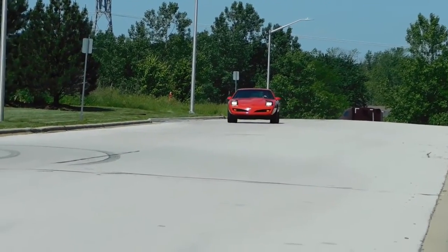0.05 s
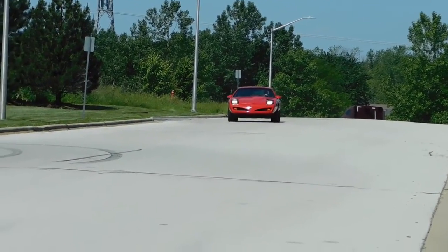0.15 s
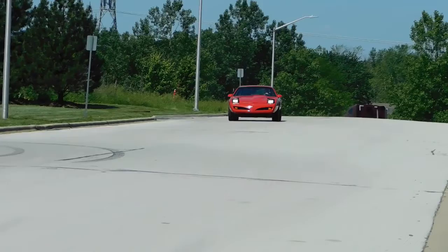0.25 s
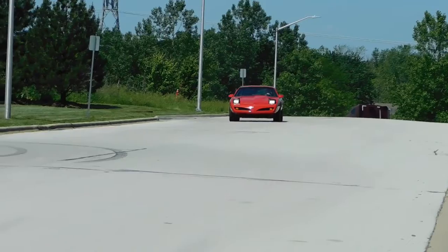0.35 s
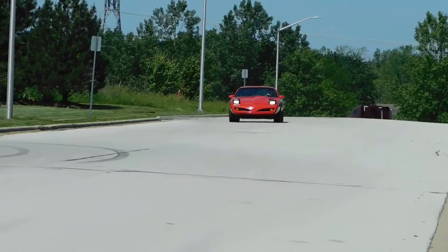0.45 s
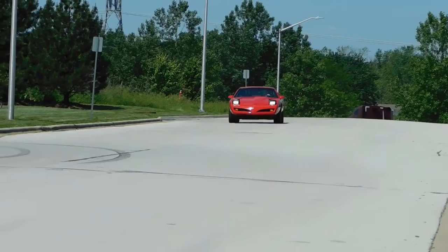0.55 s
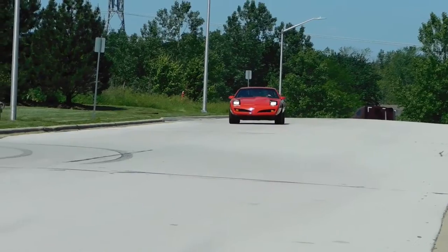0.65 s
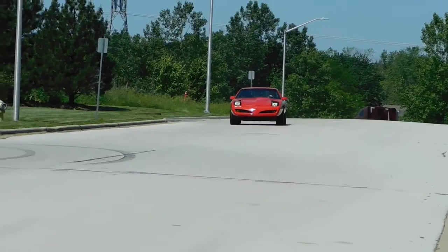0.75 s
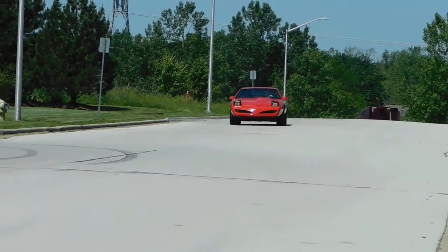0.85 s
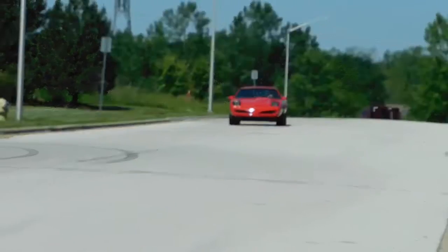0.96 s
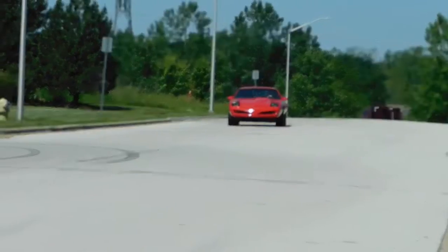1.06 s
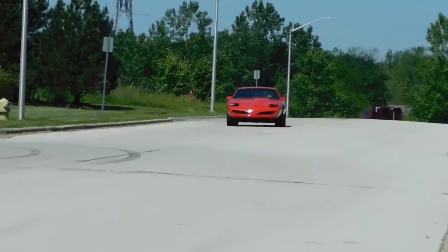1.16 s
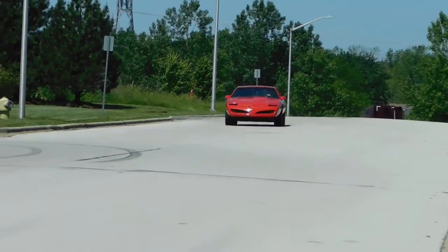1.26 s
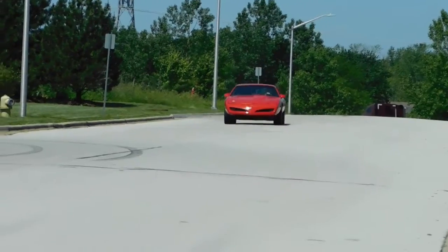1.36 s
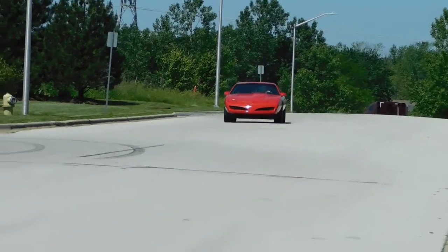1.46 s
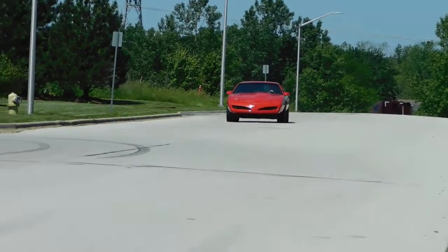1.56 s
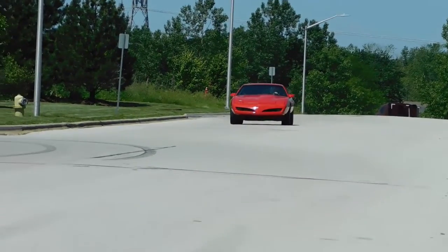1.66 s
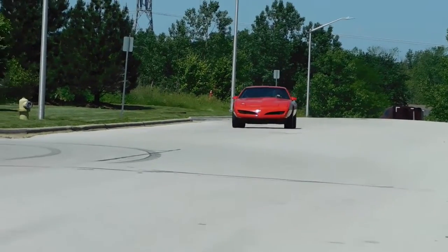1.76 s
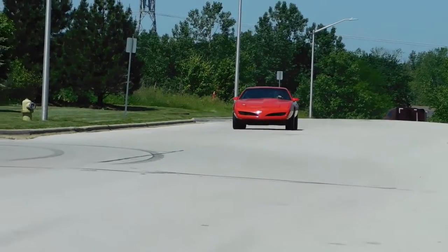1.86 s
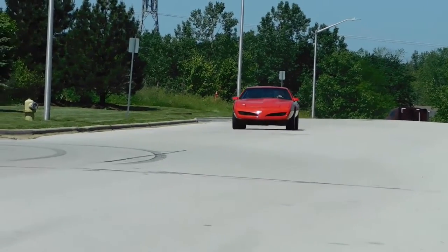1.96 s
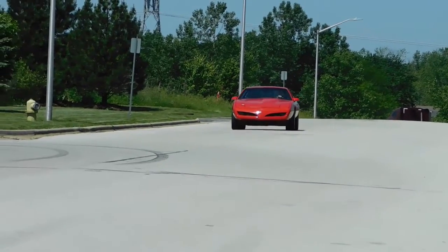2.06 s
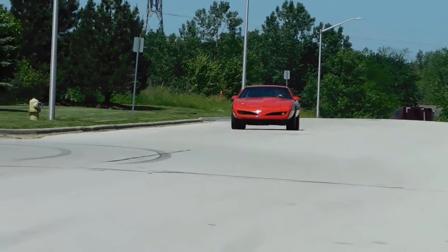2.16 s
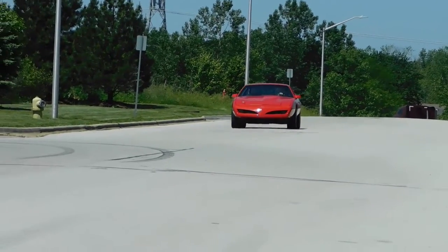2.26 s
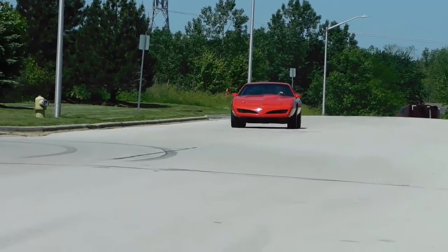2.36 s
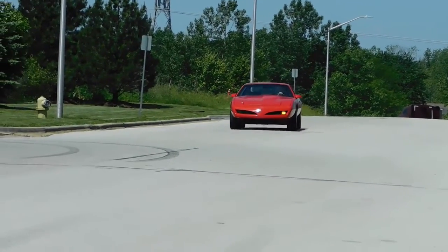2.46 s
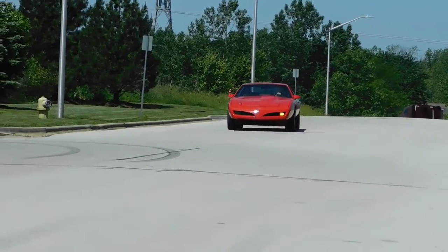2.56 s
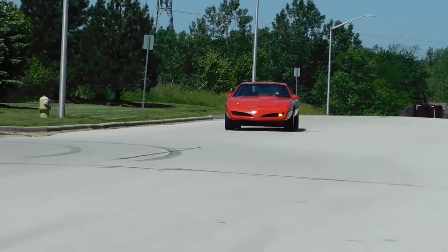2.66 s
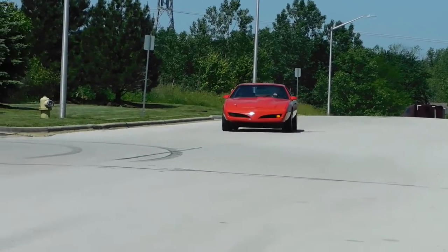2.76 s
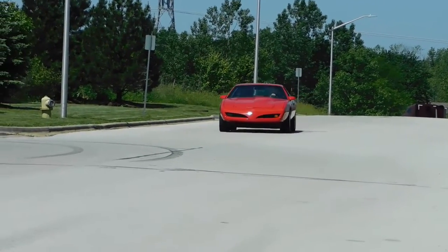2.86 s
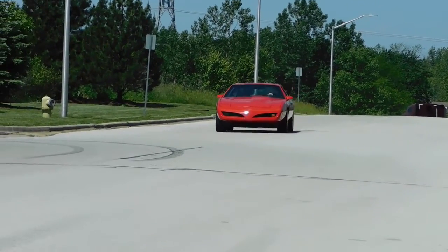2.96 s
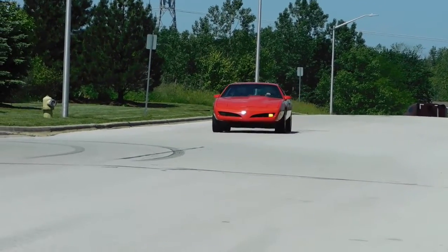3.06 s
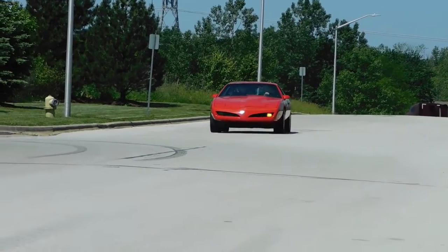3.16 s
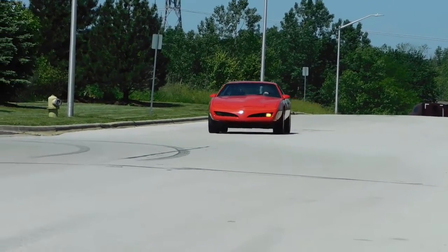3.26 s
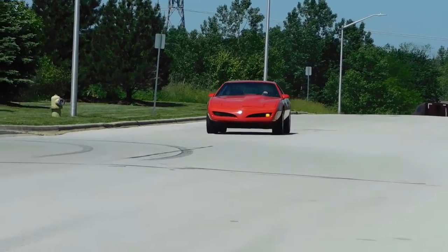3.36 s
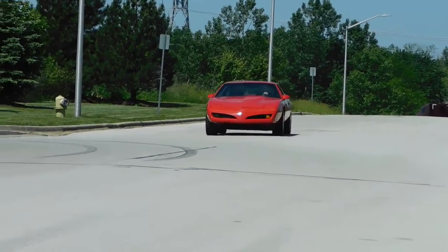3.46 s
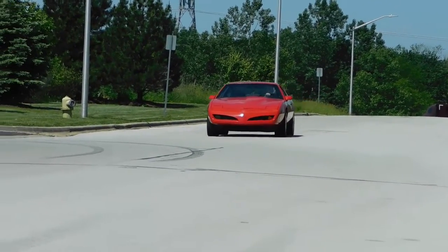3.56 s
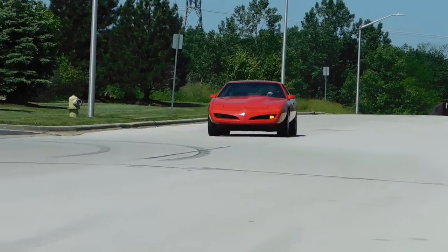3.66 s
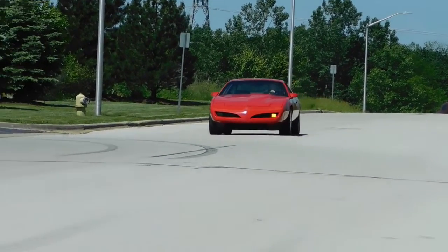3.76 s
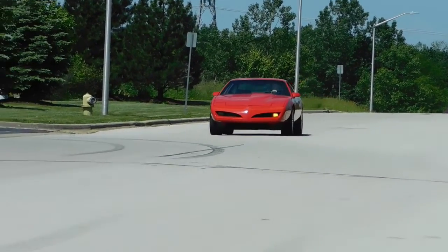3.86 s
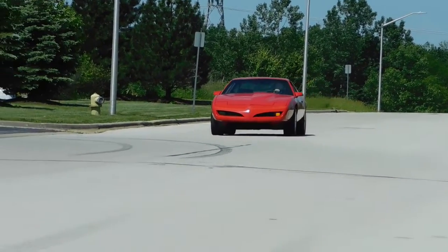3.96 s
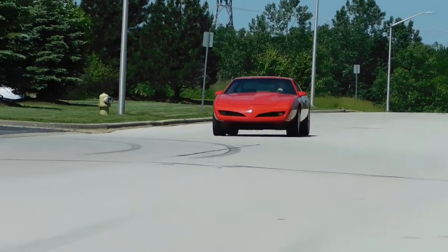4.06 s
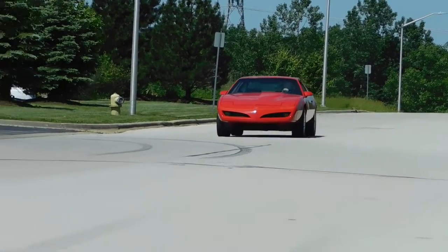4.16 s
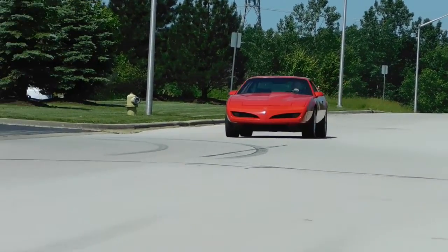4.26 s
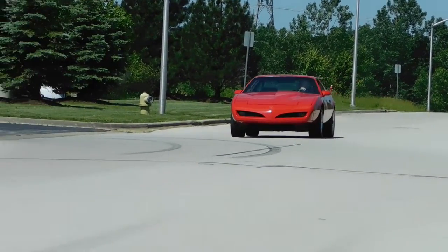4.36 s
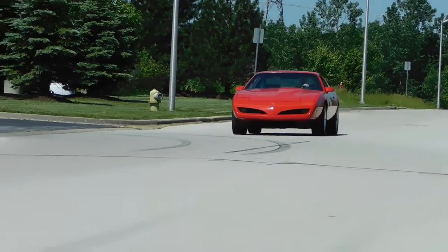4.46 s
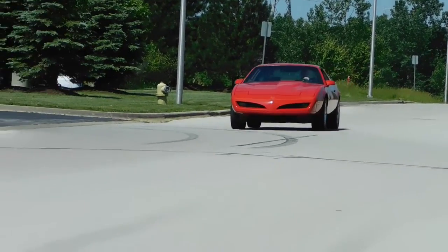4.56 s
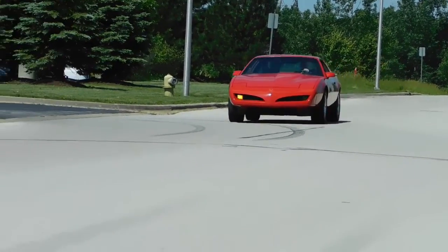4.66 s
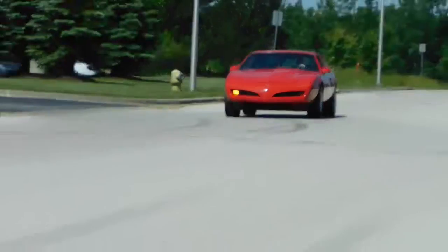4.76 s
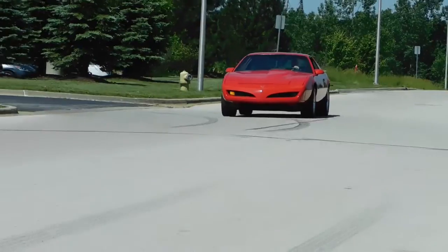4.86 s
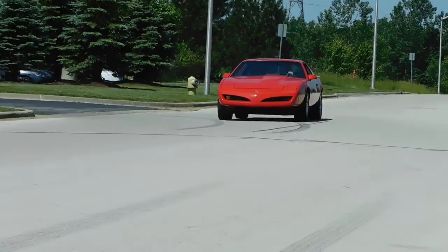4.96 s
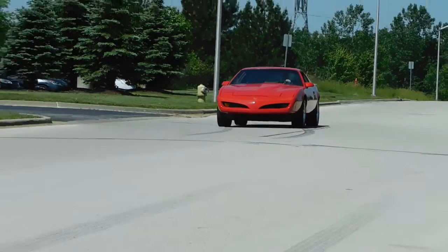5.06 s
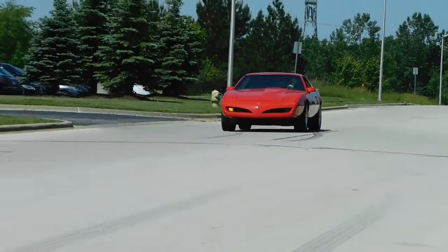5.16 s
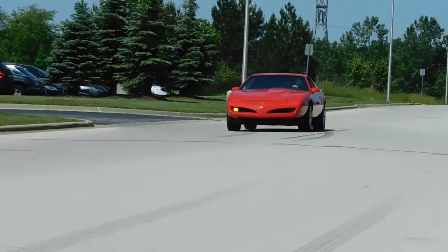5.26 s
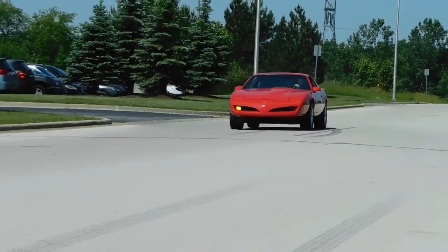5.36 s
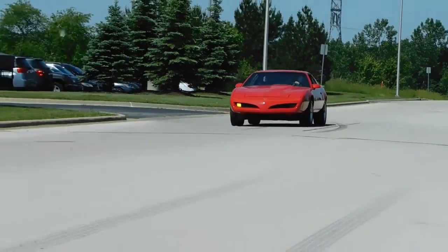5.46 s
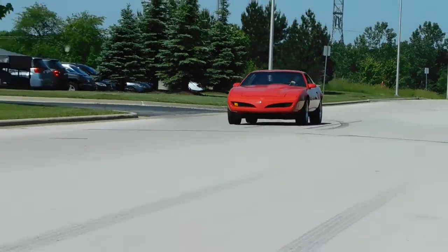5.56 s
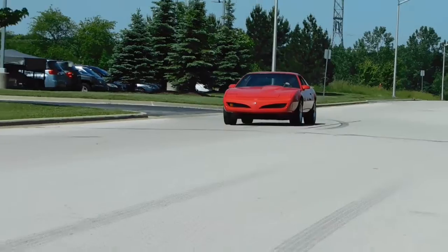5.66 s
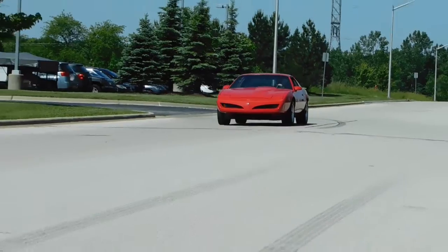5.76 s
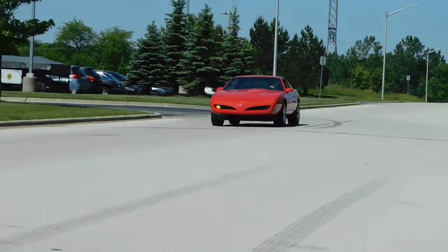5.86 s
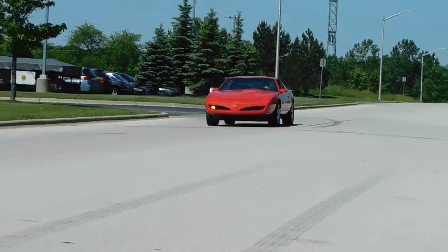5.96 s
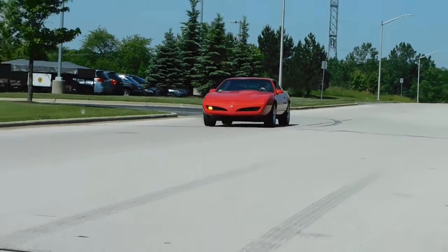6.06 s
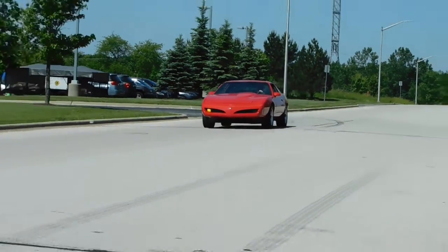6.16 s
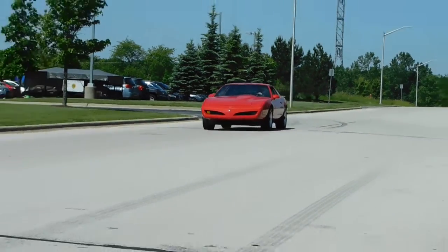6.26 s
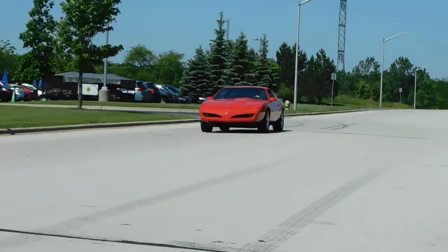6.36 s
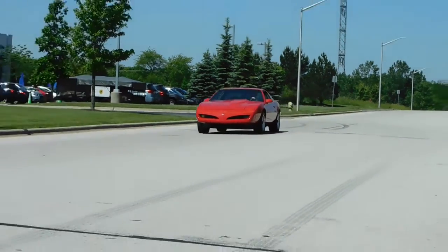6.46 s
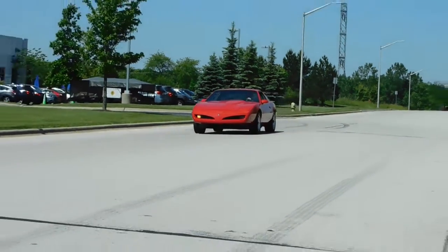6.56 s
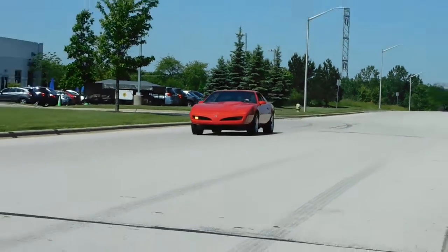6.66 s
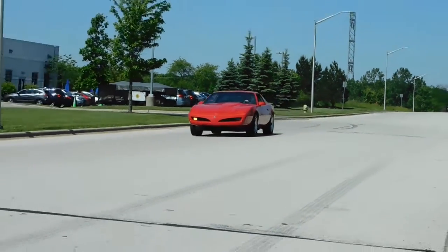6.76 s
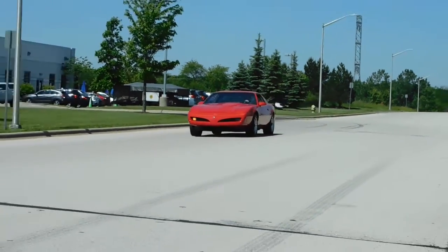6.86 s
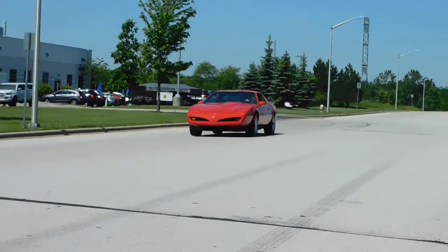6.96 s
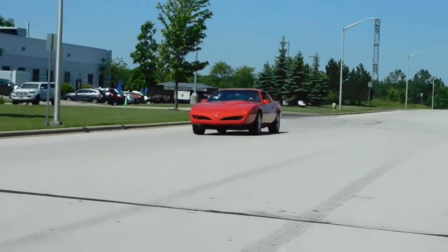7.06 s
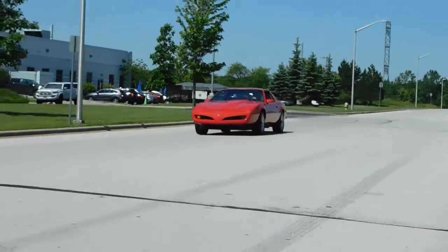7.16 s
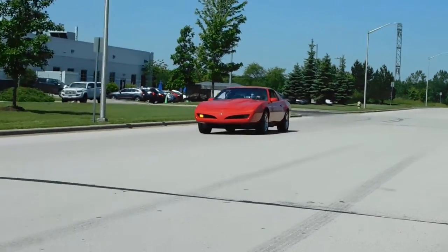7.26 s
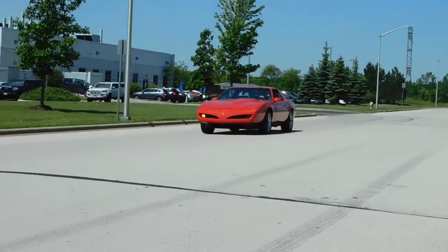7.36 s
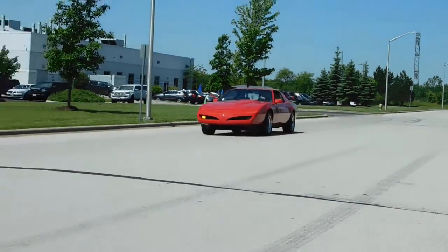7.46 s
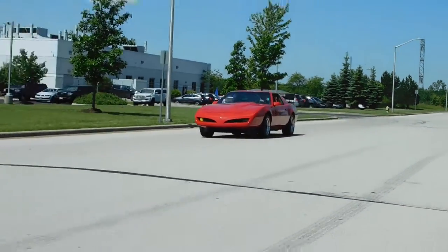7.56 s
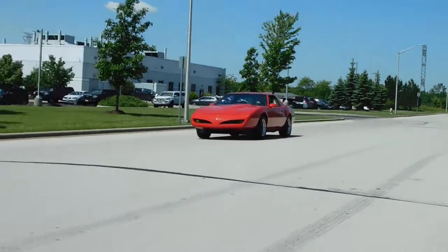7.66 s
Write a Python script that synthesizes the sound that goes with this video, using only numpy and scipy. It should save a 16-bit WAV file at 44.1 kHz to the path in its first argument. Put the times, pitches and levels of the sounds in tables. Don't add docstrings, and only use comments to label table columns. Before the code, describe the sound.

Outdoors beside a wide concrete road, a handheld stereo microphone picks up distant traffic hum and sparse bird chirps. A car approaches head on, its tyre roar steadily swelling. Small knocks and a faint lens motor whirr sit close by. Three short, buzzing two-tone horn toots ring out about half a second apart with brief echoes, then the engine surges upward as the clip ends.

```python
import sys
import numpy as np
from scipy import signal
from scipy.fft import rfft, irfft, next_fast_len
from scipy.io import wavfile
from scipy.ndimage import uniform_filter1d

SR = 44100
rng = np.random.default_rng(int(sys.argv[2]) if len(sys.argv) > 2 else 0)


def to_wav(sig):
    pcm = np.clip(np.atleast_2d(sig), -1, 1) * 32767
    pcm = np.round(pcm).astype(np.int16)
    wavfile.write(sys.argv[1], SR, pcm.T)


def field_ratio(decibels):
    return 10 ** (np.asarray(decibels, dtype=float) / 20)


N = 340438
T = np.arange(N) / SR
PADDED = 2 * next_fast_len(N // 2 + 2048)
HZ = np.maximum(np.fft.rfftfreq(PADDED, 1 / SR), 1)

# time_s, second_firing_order_hz, load_db
ENGINE = [(3.9, 160.8, -78), (4.28, 173, -58), (4.6, 176.4, -63.5), (4.94, 145.4, -62.5),
          (5.88, 152.3, -56.5), (6.54, 154.7, -55), (7.05, 162.5, -55), (7.31, 164, -53),
          (7.42, 207.6, -42), (7.5, 255.3, -40.5), (7.6, 288, -40.5), (7.72, 324.6, -47)]
# time_s, level_db
NEARNESS = [(0, -62), (1, -52.5), (2, -52), (3.1, -44.5), (3.6, -45), (4.1, -41.5), (5, -39), (6, -38),
            (6.5, -34.5), (7.2, -31.5), (7.5, -29), (7.72, -25.5)]
# pitch_hz, level_db (per Hz)
TYRE_ROAR = [(240, -37.5), (400, -15), (453, -7.5), (485, -11), (600, -16), (943, 0.5), (1060, -1),
             (1330, -0.5), (1560, -10.5), (1900, -10.5), (2080, -15.5), (2620, -18.5), (4000, -28.5),
             (5200, -48), (8800, -120)]
# pitch_hz, level_db (per Hz)
LOW_RUMBLE = [(24, -58), (40, -37), (70, -6), (193, -6.5), (242, -2.5), (307, -6.5), (457, -9), (600, -19),
              (780, -49), (1320, -120)]
# pitch_hz, level_db (per Hz)
BRIGHT_HISS = [(1180, -37), (2000, -6), (2520, -2.5), (3620, -8.5), (5150, -11), (7020, -8.5),
               (9090, -16.5), (10900, -30.5), (11500, -29.5), (13000, -21), (15000, -31.5), (15600, -38)]
CYLINDERS = [4, -9, 6, -13, -2.5, 6, -8, -8]
FIRING_ORDERS = [-3, -0.5, -9.5]
# start_s, length_s, start_hz, end_hz, level_db
DRONES = [
    (4.801, 1.32, 356, 363.5, -56.5),
    (5.4, .92, 250, 260, -59.5),
    (6.9, 0.664, 344, 365.3, -52),
    (6.9, .35, 447, 458, -53),
    (7.202, 0.38, 115, 121.6, -53.5),
    (7.348, .56, 89, 101.3, -48.5),
    (7.54, .13, 245, 268, -42.5),
]
# pitch_hz, level_db (per Hz)
FAR_TRAFFIC = [(15, -62), (25, -21), (66, -10.5), (169, -11), (204, -10), (332, -9), (423, -8.5),
               (725, -8.5), (975, -3.5), (1060, -4), (1380, -5.5), (1670, -8.5), (1860, -10.5),
               (2790, -17.5), (15600, -53)]
# pitch_hz, likeness (0 to 1)
FAR_ALIKE = [(300, 1), (700, 0.93), (1150, 0.99), (1800, .45), (2500, 1), (4000, 0.22), (9000, 0.055)]
# pitch_hz, likeness (0 to 1)
CAR_ALIKE = [(300, 0.98), (700, 0.83), (1250, 1), (2100, .8), (4000, 0.66), (9000, 0.36), (13000, 0.25)]
# start_s, length_s, start_hz, end_hz, level_db
CHIRPS = [(.175, .03, 4850, 4150, -67), (.345, .015, 4100, 4100, -66), (0.389, .025, 4350, 3450, -62.5),
          (1.36, .03, 4850, 4250, -68), (1.42, .02, 2900, 2800, -66), (1.53, .02, 4400, 4300, -70),
          (1.555, .04, 4450, 4250, -70), (1.725, .03, 4900, 4230, -74), (1.785, .043, 3770, 3420, -63),
          (2.43, .02, 4800, 4320, -69), (2.68, .02, 4170, 4200, -69), (3.795, .03, 4400, 4100, -67),
          (3.827, .033, 4100, 4500, -67), (4.771, .16, 3990, 3960, -60)]
# start_s, start_hz, first_level_db, second_level_db
CHIRP_PAIRS = [
    (3.597, 4650, -72, -67),
    (3.84, 4830, -64, -67),
    (4.012, 4700, -65, -64),
    (4.158, 4650, -65, -64),
    (4.317, 4600, -62, -68),
    (4.46, 4600, -60, -69),
]
# start_s, length_s, level_db
WHISTLES = [
    (3.35, .12, -86),
    (3.64, .07, -79),
    (3.895, .064, -76),
]
# start_hz, middle_hz, end_hz
WHISTLE_BEND = (7050, 7230, 7240)
# start_s, length_s, start_hz, middle_hz, end_hz, level_db
THROBBING_TONE = [
    (3.963, 0.62, 7480, 7510, 7250, -69.5),
]
# start_s, arch_top_hz, short_arch_top_hz, closing_start_s, level_db
HOARSE_CALLS = [
    (.733, 4370, 3060, .796, -52),
    (2.166, 5040, 3720, 2.237, -50.5),
]
# delay_s, length_s, start_hz, middle_hz, end_hz
CLOSING_FIGURE = [
    (0, .024, 2990, 3260, 4300),
    (0.027, .025, 3920, 3220, 3220),
]
# start_s, peak_db, ring_hz, crack_db, left_over_right_db
KNOCKS = [(2.806, -14.5, 1225, -60, 0), (2.883, -26, 1110, -60, 0), (4.672, -30, 3100, -60, -6),
          (4.722, -32, 3380, -44, 10), (4.758, -27.5, 637, -28, 4), (4.76, -29, 1700, -60, 4),
          (6.2855, -10.5, 1280, -14.5, -1.5), (6.2842, -12.5, 2030, -20.5, 0),
          (6.292, -15.5, 1100, -49, -5), (7.342, -18, 2220, -21.5, -1), (6.287, -23.5, 420, -60, -1)]
# start_s, peak_db, ring_hz, crack_db, left_over_right_db
TICKS = [
    (4.694, -30, 2650, -47, 8),
    (4.699, -39, 2720, -44, 13),
    (7.286, -34, 1500, -28.5, 7.5),
]
# pitch_hz, width_hz, level_db
LENS_RINGS = [(2606, 280, 3), (6920, 230, -1.5), (9060, 700, -23.5), (14000, 1500, -16)]
# start_s, held_s, brightness_db (per octave), low_horn_notch_hz, high_horn_notch_hz
TOOTS = [
    (5.229, 0.16, -1, 2690, 2350),
    (5.778, 0.18, 0, 3200, 2530),
    (6.335, 0.18, 4.5, 3460, 2850),
]
LOW_OVERTONES = [-9, -11.5, -2, -9.5, -9, -19.5, -18.5, -17.5, -23.5, -33, -44, -39, -42, -42, -40, -45,
                 -48, -56, -59, -55, -39]
HIGH_OVERTONES = [-9, -16, 0.1, -3.5, -10.5, -17, -22.5, -29.5, -40, -38.5, -41.5, -44, -38, -45, -54, -55,
                  -42, -51]
# delay_s, level_db
ECHOES = [
    (.031, -26),
    (.058, -10.5),
    (.094, -25.5),
    (0.135, -24),
]
# delay_s, pitch_ratio, level_db
BACK_ECHO = [
    (0.116, 0.976, -18.5),
]
# pitch_hz, left_over_right_db
PORT_BALANCE = [(300, .5), (500, -2), (700, 3), (900, 7), (1250, -0.5), (1500, 1.5), (2050, 4.5), (2450, 3),
                (3400, 8.5), (4100, 4), (5000, 9.5), (6900, 9), (8300, 6), (13000, -0.5)]
# pitch_hz, right_lead_radians
PORT_PHASE = [(300, 0), (600, -.2), (1050, .4), (1400, 0), (1750, -.4), (2400, 0), (3400, -.3), (5500, .8),
              (8300, 2.7), (13000, 3.5)]


def rms_one(x):
    return x / np.sqrt(np.mean(x ** 2) + 1e-20)


def in_time(rows):
    s, *columns = np.transpose(rows)
    return [np.interp(T, s, column) for column in columns]


def on_bins(points):
    hz, value = np.transpose(points)
    return np.interp(np.log(HZ), np.log(hz), value)


def drift(rate_hz):
    spectrum = rfft(rng.standard_normal(PADDED))
    return rms_one(irfft(spectrum / (1 + (HZ / rate_hz) ** 2))[:N])


def resonate(x, hz, width_hz):
    r = np.exp(-np.pi * width_hz / SR)
    top = (1 - r * r) / 2
    return signal.lfilter([top, 0, -top], [1, -2 * r * np.cos(2 * np.pi * hz / SR), r * r], x)


def wide_noise(spectrum, alike, gate=1):
    shared, own = rfft(gate * rng.standard_normal((2, N)), PADDED) * field_ratio(on_bins(spectrum))
    likeness = np.clip(on_bins(alike), 0, 1)
    right = likeness * shared + np.sqrt(1 - likeness ** 2) * own
    return rms_one(irfft([shared, right])[:, :N])


def glide(s, length, start_hz, middle_hz, end_hz, level_db, throb_hz=0, hoarse=0):
    t = np.arange(int(length * SR)) / SR
    bend = np.polyfit([0, .5, 1], [start_hz, middle_hz, end_hz], 2)
    hz = np.polyval(bend, t / length)
    hz *= 1 + hoarse * rms_one(uniform_filter1d(rng.standard_normal(len(t)), size=60))
    swell = np.sin(np.pi * t / length) ** 0.35
    tone = swell * np.cos(np.pi * throb_hz * t) * np.sin(2 * np.pi * np.cumsum(hz) / SR)
    out = np.zeros(N + SR)
    first = int(s * SR)
    out[first:first + len(t)] = field_ratio(level_db + 4) * tone
    return out[:N]


def engine_tones(firings, second_hz, load_db, nearing_db):
    pipe_hz, pipe_width_hz, pipe_lift_db = 250, 65, 5
    boom_on_s, throttle_s = 6.99, 7.39
    fan_ratio, fan_db = 1.4, -2.5
    boom_shape = np.minimum((T - boom_on_s) / 0.093, (throttle_s - T) / .04)
    boom_db = 14 * np.clip(boom_shape, 0, 1)
    covered_db = -7 * np.clip((T - throttle_s) / .1 + .5, 0, 1)
    first_db = 0.99 * nearing_db + 1.65 * covered_db + 3
    ratios = [1, 2, 3, fan_ratio]
    levels_db = [*FIRING_ORDERS, fan_db]
    lifts_db = [first_db, 0, boom_db, covered_db]
    tones = 0
    for ratio, order_db, lift_db in zip(ratios, levels_db, lifts_db):
        off_pipe = 2 * (ratio * second_hz / 2 - pipe_hz) / pipe_width_hz
        pipe_db = pipe_lift_db / (1 + off_pipe ** 2)
        level_db = load_db + order_db + lift_db + pipe_db + 1.7 * drift(5.9)
        tones = tones + np.sqrt(2) * field_ratio(level_db) * np.sin(2 * np.pi * ratio * firings)
    heard = np.clip((T - 3.85) / 0.29, 0, 1)
    return heard * tones


def car():
    second_hz, load_db = in_time(ENGINE)
    roar_db, = in_time(NEARNESS)
    nearing_db = roar_db + 35
    rumble_db = -49.5 + 1.3 * nearing_db
    hiss_db = -51.5 + 2.08 * nearing_db
    firings = np.cumsum(second_hz / 2 * (1 + 0.01198 * drift(14))) / SR
    tones = engine_tones(firings, second_hz, load_db, nearing_db)

    push = field_ratio(np.array(CYLINDERS))[firings.astype(int) % 8]
    pulses = push * (np.diff(np.floor(firings), prepend=0) > 0)
    exhaust = rms_one(resonate(pulses, 115, 60) + 0.77 * resonate(pulses, 346, 120))

    throb = 1 + 0.29 * push * np.exp(-3.5 * (firings % 1))
    grit = field_ratio(0.63 * drift(60) + 0.84 * drift(7.3))
    noise = field_ratio(roar_db) * wide_noise(TYRE_ROAR, CAR_ALIKE, gate=grit)
    noise = noise + field_ratio(rumble_db) * wide_noise(LOW_RUMBLE, CAR_ALIKE)
    noise = noise + field_ratio(hiss_db) * wide_noise(BRIGHT_HISS, CAR_ALIKE, gate=throb * grit)

    drones = 0
    for s, length, start_hz, end_hz, level_db in DRONES:
        middle_hz = (start_hz + end_hz) / 2
        drones = drones + glide(s, length, start_hz, middle_hz, end_hz, level_db, hoarse=0.021)
    return noise + tones + drones + field_ratio(rumble_db - 9) * exhaust


def far_traffic():
    level_db = -46 + 0.58 * drift(0.66)
    hum = field_ratio(level_db) * wide_noise(FAR_TRAFFIC, FAR_ALIKE, gate=field_ratio(0.78 * drift(40)))
    hum += field_ratio(-7.5) * resonate(hum, 3200, 810)
    hum += field_ratio(-13.5) * resonate(hum, 6900, 1200)
    return hum


def clear_notes():
    notes = []
    for s, length, start_hz, end_hz, level_db in CHIRPS:
        notes.append((s, length, start_hz, (start_hz + end_hz) / 2, end_hz, level_db))
    for s, hz, *pair_db in CHIRP_PAIRS:
        for k, level_db in enumerate(pair_db):
            notes.append((s + k * .039, 0.019, hz, hz * .92, hz * 0.766, level_db))
    for s, length, level_db in WHISTLES:
        notes.append((s, length, *WHISTLE_BEND, level_db))
    return notes


def hoarse_notes():
    arch_start_hz, arch_end_hz = 3980, 3250
    lead_s, short_s = 0.026, .016
    notes = []
    for s, top_hz, short_hz, closing_s, level_db in HOARSE_CALLS:
        lead_hz = 1.3 * top_hz
        notes.append((s - lead_s, lead_s, lead_hz, .9 * lead_hz, .86 * lead_hz, level_db - 12.5))
        notes.append((s, .05, arch_start_hz, top_hz, arch_end_hz, level_db))
        notes.append((closing_s - 1.3 * short_s, short_s, arch_end_hz, short_hz, arch_end_hz, level_db - 2))
        for delay, *shape in CLOSING_FIGURE:
            notes.append((closing_s + delay, *shape, level_db))
    return notes


def birds():
    song = field_ratio(3.5) * sum(glide(*note, hoarse=.008) for note in clear_notes())
    song += sum(glide(*note, throb_hz=23.9, hoarse=0.0046) for note in THROBBING_TONE)
    for note in hoarse_notes():
        song += glide(*note, hoarse=0.021)
        song += .5 * glide(*note, throb_hz=810, hoarse=0.027)
    near_leaves = field_ratio(-9) * np.roll(song, int(.007 * SR))
    far_leaves = field_ratio(-13) * np.roll(song, int(.019 * SR))
    return song + near_leaves + far_leaves


def knocks():
    out, t = np.zeros((2, N)), T[:SR // 20]
    hits = [(*row, row[2] + 1390) for row in KNOCKS]
    hits += [(*row, 12000) for row in TICKS]
    for s, level_db, hz, crack_db, pan_db, top_hz in hits:
        ring = field_ratio(level_db - 60 * t * hz / 17) * np.sin(2 * np.pi * hz * t)
        ring = ring * (1 - np.exp(-t * hz * 1.75))
        burst = (t == 0) * 3 + .5 * rng.standard_normal(len(t))
        crack = field_ratio(crack_db - 60 * t / 0.013) * burst
        band = signal.butter(2, [700, top_hz], "band", fs=SR, output="sos")
        crack = signal.sosfilt(band, crack) * np.sqrt(SR / 2 / top_hz)
        first = round(s * SR)
        out[:, first:first + len(t)] += (ring + crack) * field_ratio([[pan_db / 2], [-pan_db / 2]])
    return out


def lens():
    on_s, kick_end_s, off_s, steps_hz = 4.693, 4.78, 7.08, 125.3
    steps = np.cumsum(steps_hz * (1 + 0.032 * drift(3.7))) / SR
    strength = field_ratio(rng.normal(0, 2.0, 2000))[steps.astype(int)]
    ticks = strength * (np.diff(np.floor(steps), prepend=0) > 0)
    puffs = ticks + 0.031 * rng.standard_normal(N)
    buzz = 0
    for hz, width_hz, ring_db in LENS_RINGS:
        once = resonate(puffs, hz, 1.6 * width_hz)
        buzz = buzz + field_ratio(ring_db) * rms_one(resonate(once, hz, 1.6 * width_hz))
    buzz += field_ratio(-5.5) * rms_one(resonate(rng.standard_normal(N), 5000, 9000))
    level_db = -61.5 + 4.5 * np.clip((kick_end_s - T) / .04, 0, 1)
    running = np.clip(np.minimum((T - on_s) / .004, (off_s - T) / 0.66), 0, 1)
    return running * field_ratio(level_db + 8) * buzz * field_ratio([[0], [-16]])


def diaphragm(t, hz, on_s, off_s, overtones, bright_db, notch_hz):
    horn_db = -23.5
    swing = np.clip((t - on_s) / .02, 0, 1) * np.exp(-np.maximum(t - off_s + .006, 0) / .016)
    shake = 0.0061 * rms_one(uniform_filter1d(rng.standard_normal(len(t)), size=90))
    cycles = np.cumsum(hz * (1 - .04 * (1 - swing) + shake)) / SR
    rasp = signal.lfilter([1, -1.2, .6], 1, rng.standard_normal(len(t)))
    out = field_ratio(horn_db - 38.5) * swing * rasp
    for k, order_db in enumerate(overtones, start=1):
        tilt_db = bright_db * np.log2(max(k * hz / 1450, 1))
        notch_db = -10.5 / (1 + (2 * (k * hz - notch_hz) / 420) ** 2)
        waver_db = 2.3 * np.sin(2 * np.pi * (rng.uniform(3, 6.3) * t + rng.random()))
        level_db = horn_db + 0.26 + order_db + tilt_db + notch_db + waver_db
        tone = np.sin(2 * np.pi * (k * cycles + rng.random()))
        out += field_ratio(level_db) * swing ** (.5 + 0.34 * k) * tone
    return out


def horn():
    low_hz, high_hz = 384.9, 470.85
    middle_toot_s = TOOTS[1][0]
    out = np.zeros(N)
    for on, held, bright_db, low_notch_hz, high_notch_hz in TOOTS:
        part = slice(int((on - .05) * SR), int((on + 0.41) * SR))
        t, off = T[part], on + held
        rise = (1 + .001 * (on - middle_toot_s)) ** 2
        out[part] += diaphragm(t, low_hz * rise, on + .014, off + .019, LOW_OVERTONES, bright_db, low_notch_hz)
        out[part] += diaphragm(t, high_hz, on, off, HIGH_OVERTONES, bright_db, high_notch_hz)

    dull = signal.lfilter([.0225], [1, -1.7, .7225], out)
    (lag, ratio, back_db), = BACK_ECHO
    for on, *_ in TOOTS:
        level_db = back_db + 5.5 * (on - middle_toot_s) + 2.5
        lowered = np.interp(on + (T - on - lag) * ratio, T, dull)
        out += field_ratio(level_db) * lowered * (abs(T - on - .2) < .28)
    return out + sum(field_ratio(echo_db) * np.roll(dull, int(delay * SR)) for delay, echo_db in ECHOES)


def ports(pair, lag_s=0):
    turn = -.5j * on_bins(PORT_PHASE) + 1j * np.pi * HZ * lag_s
    half = field_ratio(on_bins(PORT_BALANCE) / 2) * np.exp(turn)
    return irfft(rfft(pair * np.ones((2, 1)), PADDED) * [half, 1 / half])[:, :N]


def scene():
    ahead = ports(car() + horn() + knocks())
    left_far = ports(far_traffic(), lag_s=.00013)
    left_birds = ports(birds(), lag_s=.00005)
    return ahead + left_far + left_birds + lens()


def low_pass(x):
    return signal.sosfilt(signal.butter(12, 15720, fs=SR, output="sos"), x)


def record(dry):
    hiss = field_ratio(-72) * rng.standard_normal(dry.shape)
    return low_pass(dry + hiss)


dry = scene()
out = record(dry)
to_wav(out)
```